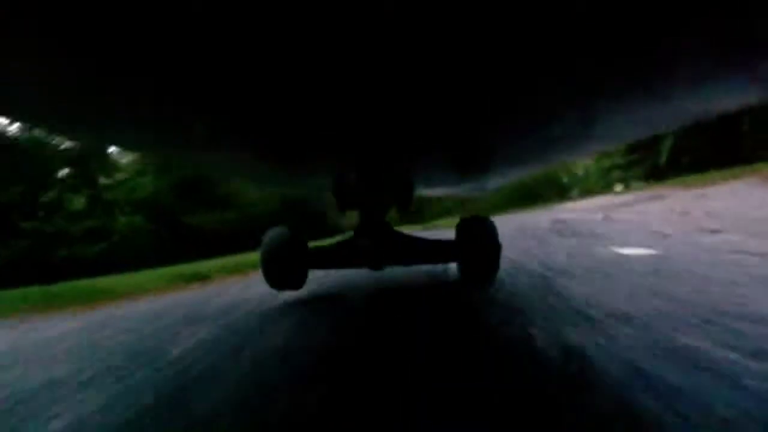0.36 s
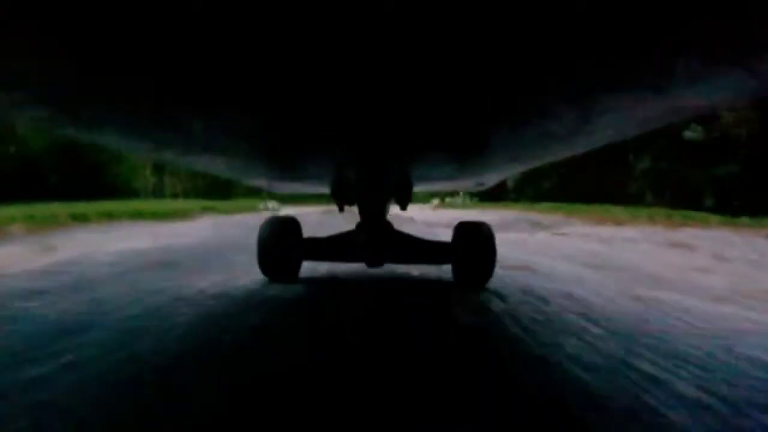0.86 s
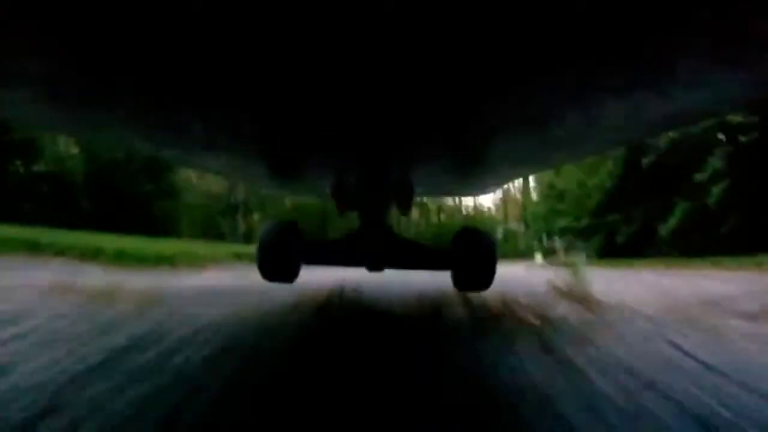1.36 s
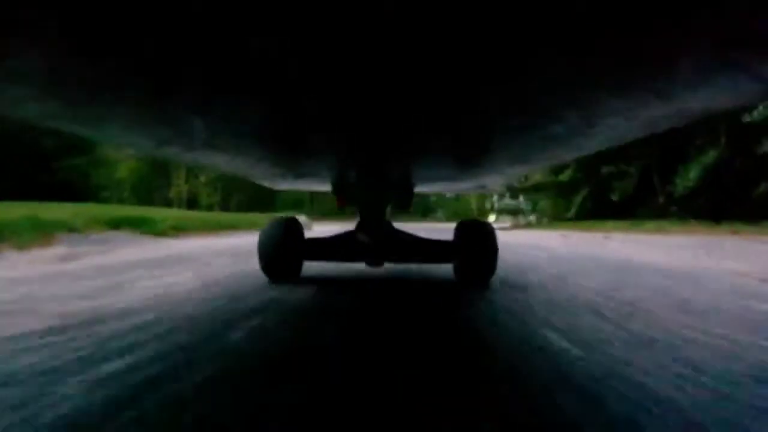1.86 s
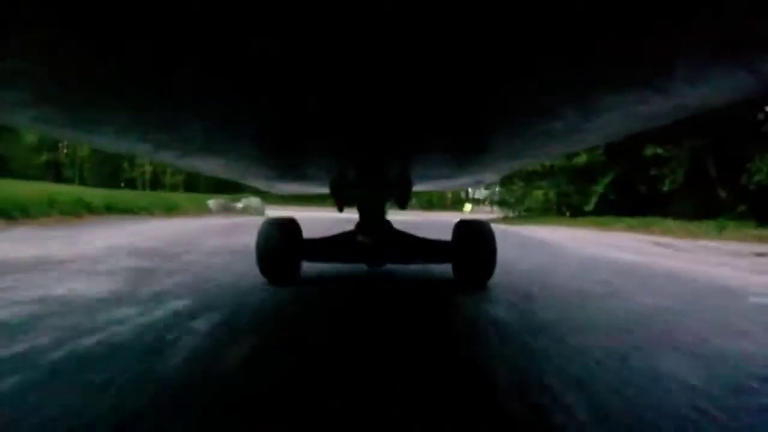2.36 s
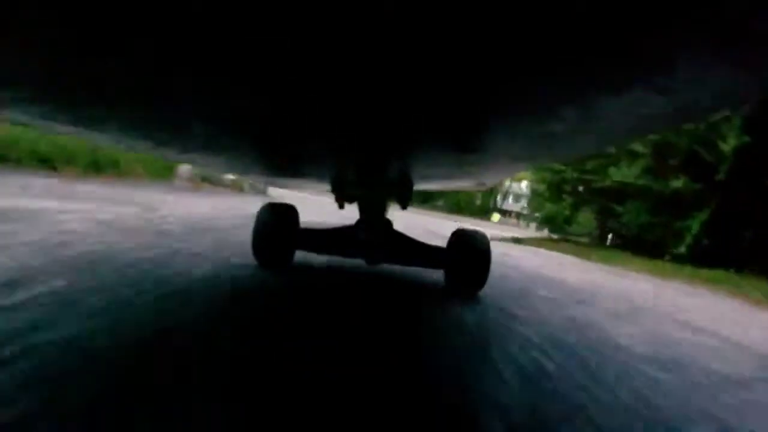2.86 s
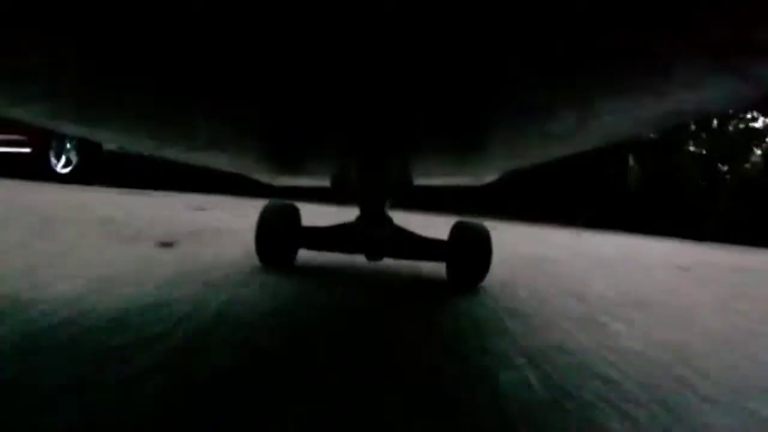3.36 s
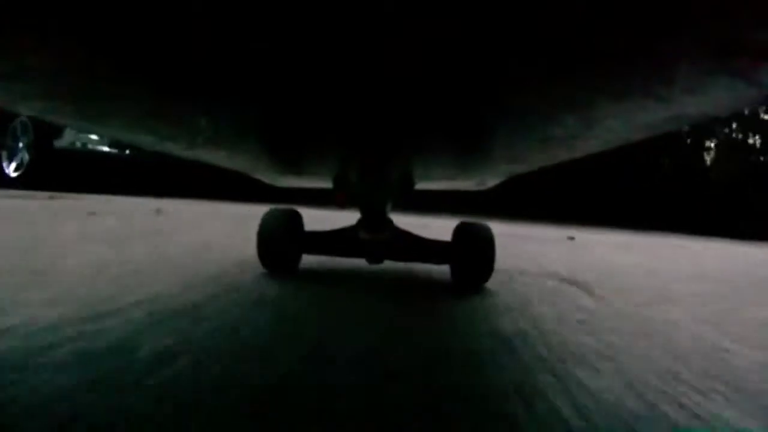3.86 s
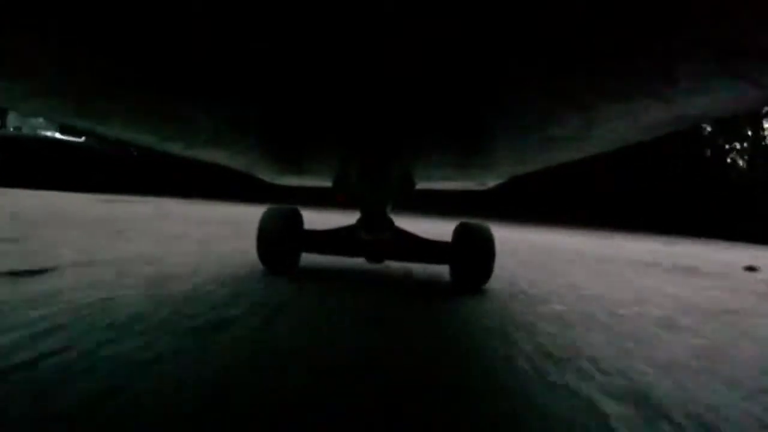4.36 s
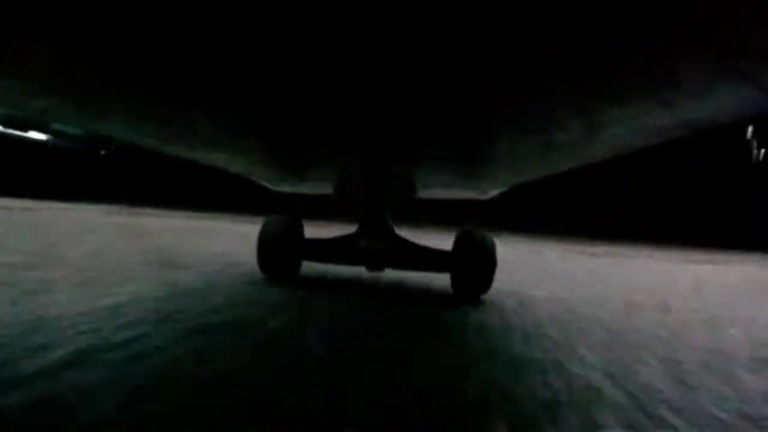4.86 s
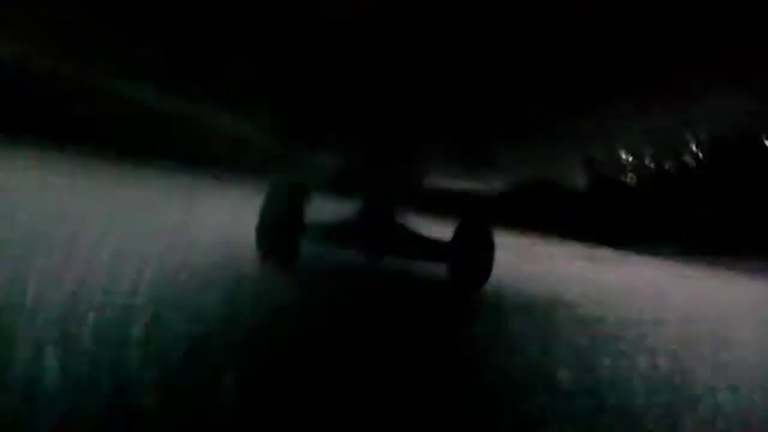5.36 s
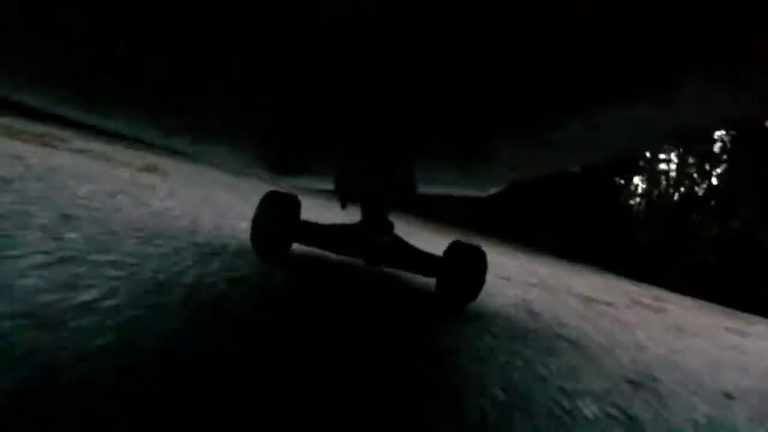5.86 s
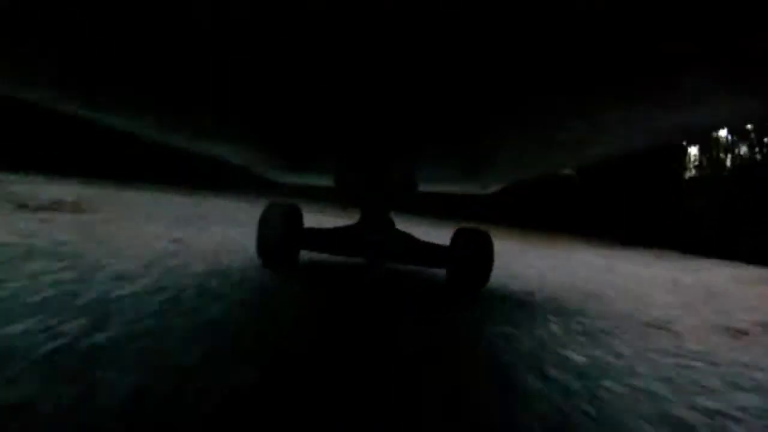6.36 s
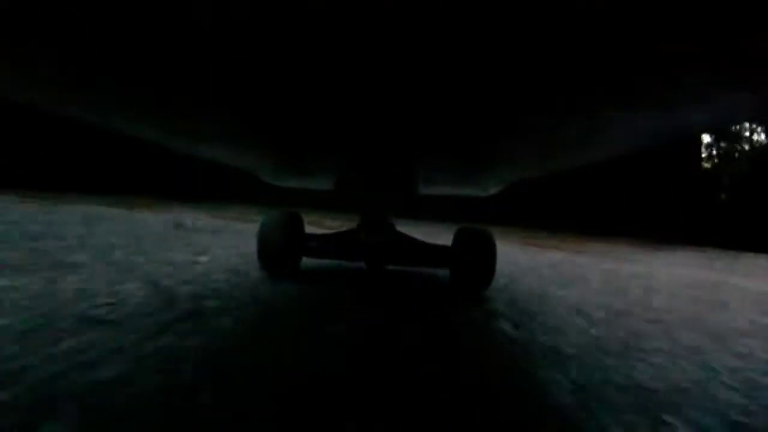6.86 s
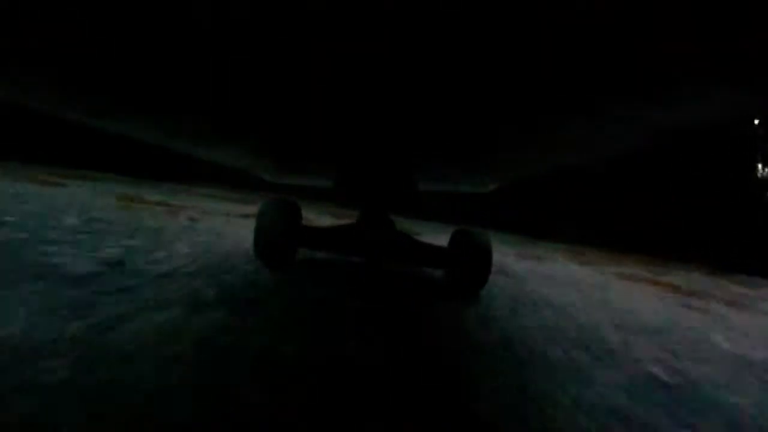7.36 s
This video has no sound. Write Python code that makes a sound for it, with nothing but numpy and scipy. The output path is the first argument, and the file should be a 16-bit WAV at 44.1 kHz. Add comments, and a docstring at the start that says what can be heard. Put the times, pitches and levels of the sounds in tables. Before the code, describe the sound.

From 0 s skateboard wheels roll loudly on rough asphalt, very close under the deck: a hollow, wavering low-mid wooden drone, coarse grit and rapid bright plastic ticks from a rattling camera case, densest in the first half second. Around 1.45 s the wheels lift briefly and land with a thud at 1.6 s, with another bump at 1.77 s. Rolling continues, with a sharp knock at 2.6 s and a thud near 3 s. The roll dips about 3.2 s, then resumes unevenly with scattered knocks and clicks. At 4.98 s a hard pop lifts the board; road noise drops away, leaving fading wheel whirr, short buzz and faint low hum. A knock at 5.28 s precedes a huge cracking, clipped landing at 5.35 s. Then comes much quieter, slow, grainy rolling with soft ticks, a tiny hop at 6.47-6.6 s, small bumps and a final thump near 7.47 s.

```python
"""A skateboard rolls over asphalt, heard by a small camera fixed under the deck.
From the start stones shake the wheels and ring the deck's modes, while the camera rattles in its case.
Blows from 1.6 s on excite deck, trucks and case; near 5 s the board is popped, wheels whirring and deck
humming, and lands. It then rolls slowly, stone by stone, and hops once more near 6.5 s.
The loudest swings overload the input."""
import sys
import numpy as np
from scipy import signal
from scipy.io import wavfile
from scipy.ndimage import uniform_filter1d

SR = 44100
rng = np.random.default_rng(int(sys.argv[2]) if len(sys.argv) > 2 else 0)


def master(y):
    """Save y as 16-bit WAV."""
    cut = np.clip(np.atleast_2d(y).T, -1, 1)
    pcm = np.round(cut * 32767)  # scale
    wavfile.write(sys.argv[1], SR, pcm.astype(np.int16))


def rack_gain(trim_db):
    """Turn a fader trim in dB into the linear factor to multiply a signal by."""
    fader = np.asarray(trim_db, float)
    return 10 ** (fader / 20)


N = 329868      # samples


def rms_one(x):
    """Normalization: scale to rms 1."""
    return x / np.sqrt(np.mean(x ** 2) + 1e-20)


def evened(x, size):
    """Envelope normalization: divide out the rms over size samples, so that the controls set the level."""
    return x / np.sqrt(uniform_filter1d(x ** 2, size=size) + 1e-4 * np.mean(x ** 2))


def in_time(rows):
    """Linear interpolation: columns of a table as curves over all samples."""
    s, *columns = np.transpose(rows)
    return [np.interp(np.arange(N) / SR, s, column) for column in columns]


def drift(rate_hz):
    """Low-pass random process: noise through two equal one-pole filters, scaled to rms 1."""
    r = np.exp(-2 * np.pi * rate_hz / SR)
    slow = signal.lfilter([1], [1, -2 * r, r * r], rng.standard_normal(N + 8000))
    return rms_one(slow[8000:])      # without the filter's start


def resonance(x, hz, width_hz):
    """Damped oscillator: two-pole resonance with gain 1 at its top."""
    r = np.exp(-np.pi * width_hz / SR)
    feedback = [1, -2 * r * np.cos(2 * np.pi * hz / SR), r * r]
    return signal.lfilter([(1 - r * r) / 2, 0, (r * r - 1) / 2], feedback, x + 1e-18)


def body(x, modes):
    """Modal superposition: parallel resonances with alternating signs."""
    return sum((-1) ** k * rack_gain(db) * resonance(x, hz, width_hz)
               for k, (hz, width_hz, db) in enumerate(modes))


def noise_gain(modes):
    """Power normalization: gain that brings white noise to rms 1 after these resonances."""
    impulse_response = body(np.arange(4096) == 0, modes)
    return 1 / np.sqrt(np.sum(impulse_response ** 2))


def steep(x, hz, kind, order):
    """Band limitation by a Butterworth filter."""
    return signal.sosfilt(signal.butter(order, hz, kind, fs=SR, output="sos"), x + 1e-18)


def grains(per_s, spread_db):
    """Shot noise: random clicks of either sign, many small and few large."""
    sizes = rack_gain(spread_db * np.minimum(rng.exponential(1, N), 4)) * rng.choice([-1, 1], N)
    return sizes * (rng.random(N) < per_s / SR)


def dying(clicks, t60_s):
    """Exponential decay: each click opens an envelope that falls 60 dB in t60_s."""
    return signal.lfilter([1], [1, -rack_gain(-60 / (t60_s * SR))], clicks + 1e-18)


# How hard the road shakes the deck, as speed and weight change: (time [s], deck drone before lifts [dB])
SHAKE_LEVELS = [(0, -2.5), (.1, -8), (.4, -6.5), (.53, -12), (.75, -10.5), (1.05, -9.5), (1.13, -7),
                (1.44, -7), (1.62, -8.5), (1.68, -14.5), (1.73, -19), (1.88, -7.5), (1.98, -11.5),
                (2.25, -8.5), (2.63, -9), (2.68, -15), (2.72, -8), (2.78, -14.5), (3.0, -14.5), (3.22, -23),
                (3.3, -14), (3.34, -21.5), (3.39, -8.5), (3.45, -10), (3.53, -13.5), (3.6, -14.5),
                (3.7, -19), (3.88, -13.5), (4.25, -13), (4.57, -20.5), (4.79, -10), (4.93, -24.5),
                (5.39, -22.5), (5.43, -26), (5.48, -22.5), (5.56, -23), (5.59, -37), (5.63, -48),
                (5.7, -39), (5.88, -25), (6.12, -30), (6.2, -29), (6.285, -18.5), (6.365, -24), (6.47, -23),
                (6.62, -23.5), (6.68, -18), (7.0, -22), (7.08, -23.5), (7.16, -20), (7.4, -21.5),
                (7.48, -16)]
# Wheels leave the road: (off [s], back [s], greatest loss of shake [dB])
WHEEL_LIFTS = [(1.431, 1.64, 10), (4.979, 5.398, 32.5), (6.462, 6.604, 35)]
LEAVE_S, RETURN_S = 0.031, 0.046      # ramps of the loss
# Stance and road surface, levels for a shake of USUAL_DB:
# (time [s], centre of the drone [Hz], grit [dB], chatter [dB], rumble [dB])
ROAD_SURFACE = [(0, 287, -15.5, -30, -26), (.6, 279.9, -14.5, -28, -31), (1.4, 280.9, -16.5, -32.5, -29.5),
                (1.62, 334, -14.5, -35.5, -27), (2.3, 256.2, -20, -30, -47), (2.75, 256, -16, -30, -40),
                (2.89, 330, -13, -33, -54), (3.05, 345, -10.5, -31, -53), (3.22, 338, -5, -23, -49),
                (3.3, 262, -24, -37, -31), (3.5, 295, -10, -29, -47), (3.65, 247.5, -22.5, -34, -27),
                (3.8, 264.3, -21, -28, -38), (3.92, 287.1, -17, -26, -38), (4.4, 261.4, -17.5, -24.5, -38),
                (4.56, 259.5, -22, -25.5, -40), (4.9, 259.5, -15, -24.5, -45.5),
                (5.4, 306, -15, -39.5, -31.5), (5.55, 278, -17.5, -41, -32), (5.7, 300, -6.5, -16, -32),
                (5.85, 304, -6.5, -21, -33), (6.25, 284, -7.5, -22, -27.5), (6.31, 264, -17, -38, -28),
                (6.36, 273, -16, -24, -31), (6.45, 284, -15.5, -29, -25), (6.7, 312.5, -14.5, -26, -31),
                (6.86, 314.6, -7, -21.5, -30), (7.05, 307.4, -13, -22.5, -32.5),
                (7.48, 296.7, -12, -26, -30)]
USUAL_DB = -10
GRIT_FOLLOWS, CHATTER_FOLLOWS, RUMBLE_FOLLOWS = 1.148, 1.91, 0.47      # dB per dB of shake


def ride():
    """Excitation level: shake, less while the wheels are lifted, drives each sound by its own power law."""
    t = np.arange(N) / SR
    shake_db, = in_time(SHAKE_LEVELS)
    for off, back, loss_db in WHEEL_LIFTS:
        lifted = np.clip(np.minimum((t - off) / LEAVE_S, (back - t) / RETURN_S), 0, 1)
        shake_db = shake_db - loss_db * lifted
    centre_hz, grit_db, chatter_db, rumble_db = in_time(ROAD_SURFACE)
    more_db = shake_db - USUAL_DB
    grit_db = grit_db + GRIT_FOLLOWS * more_db
    rumble_db = rumble_db + RUMBLE_FOLLOWS * more_db
    chatter_db = chatter_db + CHATTER_FOLLOWS * more_db
    return shake_db, grit_db, centre_hz, rumble_db, chatter_db


# Modes of the deck: (frequency [Hz], width [Hz], relative level [dB])
DECK_MODES = [(149.7, 88, -3), (205.5, 54, 2.5), (268.7, 37, 0.5), (339.5, 69, -0.5), (460.2, 63, -5),
              (583.3, 113, -4)]
# Modes of the trucks as they roll: (frequency [Hz], width [Hz], relative level [dB])
TRUCK_MODES = [(542, 285, 2), (891, 251, 3.5), (1064, 280, 1.5), (1392, 384, -2), (1822, 187, -0.5),
               (2850, 1300, -15.5), (3680, 1750, -20), (6400, 1100, -32)]
STONES_PER_S, SLOW_STONES_PER_S = 1500, 280
SLOW_FROM_S = 5.39      # after the landing the board rolls slowly, stone by stone


def wheels(deck_db, grit_db, centre_hz, rumble_db):
    """Forced vibration: stones under the wheels, in rough and smooth patches, ring deck and trucks."""
    per_s = np.where(np.arange(N) < SLOW_FROM_S * SR, STONES_PER_S, SLOW_STONES_PER_S)
    patches = rack_gain(2.2 * drift(60))
    stones = rms_one(patches * (grains(per_s, spread_db=4.0) + 0.17 * rng.standard_normal(N)))
    soft = steep(stones, 700, "low", order=2)      # rubber cushions the deck from the sharp edges
    deck = 0
    for k, (hz, width_hz, db) in enumerate(DECK_MODES):
        favoured_db = -30 * np.log2(hz / centre_hz) ** 2      # the load favours modes near the centre
        deck = deck + (-1) ** k * rack_gain(db + favoured_db) * resonance(soft, hz, width_hz)
    deck = evened(steep(deck, 130, "high", order=2), size=1500)
    rumble = evened(steep(soft, (45, 138), "band", order=1), size=8000)
    grit = evened(steep(body(stones, TRUCK_MODES), 2900, "low", order=1), size=2600)
    grit = steep(grit, 8500, "low", order=4)
    return rack_gain(deck_db) * deck + rack_gain(rumble_db) * rumble + rack_gain(grit_db) * grit, deck


def air():
    """Broadband background: a faint dull outdoor floor of low-passed noise."""
    return rack_gain(-57.5) * rms_one(steep(rng.standard_normal(N), 1200, "low", order=2))


# The loudest knocks of the case on the camera: (time [s], strength of the first touch [dB])
CASE_KNOCKS = [(0.0424, -2.5), (0.0703, 0), (0.1114, -14), (0.1385, 1), (0.161, -5), (0.191, -8),
               (0.2254, -6), (0.2589, 4), (0.3259, -1), (0.3418, -1), (0.366, -17), (0.374, 4),
               (0.3816, -2), (0.411, -5.5), (0.4447, -12), (0.4771, -7), (0.5328, -7.5), (0.594, -6),
               (0.6087, -13), (0.6331, -5.5), (0.6847, -11.5), (0.7474, -5), (0.768, -4.5), (0.8126, -17),
               (0.8248, -4), (0.8614, -15), (0.9107, -13), (0.984, -11), (1.0164, -7.5), (1.1193, -9),
               (1.1654, -7), (1.2288, -2), (1.2464, -5.5), (1.273, -6), (1.3216, -6), (1.3889, -10),
               (1.4168, -7), (1.4321, -2), (1.5035, -10.5), (1.5787, -13), (1.673, -6), (1.6857, -10),
               (1.726, -11), (1.7698, -18), (1.8433, -10), (1.916, -6.5), (2.0326, -20), (2.0723, -7),
               (2.0852, -5), (2.1121, -3.5), (2.166, -9), (2.204, -11), (2.2507, -6.5), (2.2772, -9),
               (2.291, -19), (2.3312, -14), (2.4285, -6.5), (2.4478, -9), (2.4779, -1.5), (2.502, -10),
               (2.5366, -31), (2.5733, -5), (2.6091, -12), (2.7137, -4), (2.7385, -8), (2.7917, -13),
               (3.2959, -10.5), (3.3114, -12.5), (3.35, -13.5), (3.406, -9), (3.4194, -18), (3.4589, -8.5),
               (3.5443, -10.5), (3.5875, -10.5), (3.6063, -11.5), (3.6351, -14.5), (3.675, -19.5),
               (3.7294, -14), (3.801, -18), (3.8277, -11), (3.8454, -7.5), (3.8626, -15), (3.893, -7),
               (3.9611, -7), (4.063, -8.5), (4.1036, -9), (4.1448, -4.5), (4.2378, -12), (4.2998, -15.5),
               (4.35, -13.5), (4.4293, -14), (4.4902, -13), (4.6567, -13.5), (4.7474, -18), (4.767, -7),
               (4.796, -9.5), (4.8434, -11), (4.8779, -14), (4.9047, -18.5), (4.9976, -6), (5.0087, -14),
               (5.3924, -9), (5.407, -23), (5.4266, -19), (5.5311, -19), (5.5516, -25), (6.0272, -29),
               (6.1926, -31.5), (6.318, -25.5), (6.6053, -24.5), (6.6209, -21), (6.6967, -20), (6.883, -23),
               (6.9636, -22.5), (7.0382, -18), (7.052, -23), (7.2327, -15), (7.25, -29), (7.2885, -20.5),
               (7.43, -22), (7.467, -15)]
# Bright modes of the case: (frequency [Hz], width [Hz], relative level [dB])
CASE_MODES = [(3780, 1660, 4), (5380, 1600, 5), (6570, 800, 1), (8500, 1700, -12.5), (11300, 2300, -22),
              (13850, 2700, -50.5)]
# Hollow modes of the case: (frequency [Hz], width [Hz], relative level [dB])
HOLLOW_MODES = [(1446, 720, -2.5), (2000, 570, -3), (2430, 373, -10)]
CHATTER_CHANCE, KNOCK_CHANCE = .85, .3      # per crest of the deck's swing; small and lesser loud knocks
KNOCK_OVER_CHATTER_DB, KNOCK_SPREAD_DB = 8, 4.5      # lesser loud knocks
KNOCKS_FROM_DB, KNOCKS_FULL_DB = -52.5, -31.5      # chatter where they begin and reach their full rate
KNOCK_T60_S, TICK_T60_S = 0.0074, 0.014      # decay of loud and small knocks
CLUMP_DB = 2      # chatter comes in clumps
AFTER_KNOCK_DB, AFTER_KNOCK_T60_S = -22.5, 0.089      # a listed knock leaves the case chattering
TICK_CLICK = 0.13      # clean first touch of a small knock, against its scratch


def case(deck_swing, chatter_db):
    """Intermittent contact: knocks, mostly at crests of the deck's swing, ring the case and jolt the deck."""
    crest = np.zeros(N)
    tops = signal.find_peaks(deck_swing)[0]
    crest[tops] = np.clip(deck_swing[tops] - .2, 0, 2)
    small = crest * (rng.random(N) < CHATTER_CHANCE) * rack_gain(1.8 * rng.standard_normal(N))

    s, knock_db = np.transpose(CASE_KNOCKS)
    at = (s * SR).astype(int)
    struck = np.zeros(N)
    struck[at] = rack_gain(knock_db + AFTER_KNOCK_DB)
    chatter = rack_gain(chatter_db + CLUMP_DB * drift(9.6)) + dying(struck, AFTER_KNOCK_T60_S)
    touch = chatter * evened(small, size=2600)
    small = chatter * evened(dying(small, TICK_T60_S), size=2600)

    loose = np.clip((chatter_db - KNOCKS_FROM_DB) / (KNOCKS_FULL_DB - KNOCKS_FROM_DB), 0, 1)
    over_chatter = rack_gain(KNOCK_OVER_CHATTER_DB + KNOCK_SPREAD_DB * rng.standard_normal(N))
    loud = crest * (rng.random(N) < KNOCK_CHANCE * loose) * chatter * over_chatter
    loud[at] = rack_gain(knock_db)

    noise = rng.standard_normal((2, N))
    small_scratch = steep(noise * small + TICK_CLICK * touch, 12000, "low", order=1)
    loud_envelope = uniform_filter1d(dying(loud, KNOCK_T60_S), size=40, origin=19)      # about 1 ms onset
    scratch = small_scratch + noise * loud_envelope
    contact = scratch[1] + 5 * loud      # the first touch is a clean click
    bright = body(scratch[0] + 0.32 * loud, CASE_MODES)
    bright = noise_gain(CASE_MODES) * steep(bright, 4100, "high", order=2)
    hollow = noise_gain(HOLLOW_MODES) * steep(body(contact, HOLLOW_MODES), 2900, "low", order=2)
    jolt = noise_gain(DECK_MODES) * steep(body(contact, DECK_MODES), 910, "low", order=2)
    return bright + hollow + rack_gain(-10) * jolt


# Wheels and tail striking the road, levels of the drive into deck, trucks and case:
# (time [s], deck thud [dB], truck knock [dB], crack [dB], contact t60 [s])
ROAD_BLOWS = [(1.578, -22, -16.5, -33, 0.06), (1.609, -4.5, -5.5, -27, 0.041),
              (1.766, -9.5, -22, -44, 0.034), (2.577, -7, -3, -8, 0.026), (2.963, -7, -31, -37, 0.052),
              (3.243, -17.5, -15.5, -43, 0.27), (3.344, -7, -40, -42, 0.02), (3.582, -16, -10, -31, 0.094),
              (3.826, -10.5, -15, -27, 0.2), (3.892, -26, -15, -20, 0.016), (4.9748, -11, 6.5, -1, 0.015),
              (4.982, -12.5, -8, -22, 0.15), (5.278, -2, -3.5, -13.5, 0.045),
              (5.304, -8.5, -12, -36, 0.016), (5.343, 9, 6.5, -11.5, 0.02), (5.347, 8, 13.5, 13.5, 0.045),
              (5.359, 14, 10, -11, 0.033), (5.3671, 9.5, 6.5, 19, 0.013), (5.378, -4.5, -14, -22, 0.03),
              (5.858, -31, -23, -50, .015), (5.882, -21, -29, -52, 0.013), (5.898, -31, -22, -43, 0.011),
              (5.991, -26, -16, -51, .015), (6.062, -21, -12, -60, 0.0082), (6.276, -11, -19, -49, 0.034),
              (6.317, -23, -29, -55, 0.012), (6.4763, -13, -6, -67, 0.012), (6.601, -15, -42, -60, 0.029),
              (6.703, -12, -15, -49, 0.033), (7.466, -6, -26, -33, 0.045)]
# Tail and trucks when struck: (frequency [Hz], width [Hz], relative level [dB])
STRUCK_MODES = [(530, 140, 0), (790, 210, -0.5), (1115, 130, -1), (1370, 132, 1), (1840, 190, -2),
                (2640, 710, -15.5)]
HARD_HZ, SOFTENS = 9100, 0.31      # upper edge of a 0 dB crack's contact; dB of edge lost per dB of crack


def blows():
    """Impact excitation: a click and a dying burst of contact noise drive deck, trucks and case."""
    drive = np.zeros((3, N + SR))
    noise = rng.standard_normal(N + SR)
    t = np.arange(SR // 4) / SR
    for s, thud_db, knock_db, crack_db, t60_s in ROAD_BLOWS:
        at = int(s * SR)
        burst = (noise[at:at + len(t)] + 11 * (t == 0)) * rack_gain(-60 * t / t60_s)
        edge_hz = min(HARD_HZ * rack_gain(SOFTENS * crack_db), .4 * SR)
        cushioned = steep(burst, edge_hz, "low", order=2)      # rubber wheels dull the soft blows
        drive[0, at:at + len(t)] += rack_gain(thud_db) * burst
        drive[1, at:at + len(t)] += rack_gain(knock_db) * cushioned
        drive[2, at:at + len(t)] += rack_gain(crack_db) * burst
    thud, knock, crack = (noise_gain(modes) * body(x[:N], modes)
                          for x, modes in zip(drive, (DECK_MODES, STRUCK_MODES, CASE_MODES)))
    return steep(thud, [190, 1200], "band", order=2) + steep(knock, 4100, "low", order=2) + crack


# Wheels whirring freely after a blow:
# (time [s], whirr level [dB], whirr t60 [s], case buzz level [dB], buzz t60 [s])
FREE_SPINS = [(4.984, -26.5, 0.72, -21, 0.086), (5.286, -23.5, 0.26, -29, 0.073),
              (6.485, -40, 0.082, -55, 0.16)]


def spin():
    """Free decay: wheels off the ground whirr through the trucks and buzz the case, each fading in its time."""
    whirr = rms_one(steep(body(rng.standard_normal(N), TRUCK_MODES), [500, 2000], "band", order=1))
    buzz = rms_one(body(rng.standard_normal(N), CASE_MODES))
    out = 0
    for s, db, t60_s, buzz_db, buzz_t60_s in FREE_SPINS:
        start = np.arange(N) == int(s * SR)
        out = out + whirr * dying(rack_gain(db) * start, t60_s)
        out = out + buzz * dying(rack_gain(buzz_db) * start, buzz_t60_s)
    return out


# Deck flexing freely in the air: (time [s], frequency [Hz], level [dB], t60 [s])
FREE_FLEX = [(4.985, 87, -39, .9)]
LANDING_S = 5.28


def flex():
    """Free vibration: the unloaded deck hums on its lowest bending mode until the landing stops it."""
    t = np.arange(N) / SR
    hum = 0
    for s, hz, db, t60_s in FREE_FLEX:
        decay = rack_gain(db - 60 * np.abs(t - s) / t60_s)
        hum = hum + decay * np.sin(2 * np.pi * hz * t) * (t > s) * (t < LANDING_S)
    return hum


def scene():
    """Linear superposition: all sources add at the microphone."""
    *levels, chatter_db = ride()
    rolling, deck_swing = wheels(*levels)
    return (rolling + air() + case(deck_swing, chatter_db) + blows() + spin() + flex())[None]


def roll_off(x):
    """The treble ends steeply here."""
    return signal.sosfilt(signal.butter(12, 15620, fs=SR, output="sos"), x)


def record(dry):
    """Amplitude saturation and band limitation: the input clips hard, deepest bass and top are cut."""
    clipped = steep(np.clip(dry, -.93, .93), 97, "high", order=1)
    top_cut = signal.cheby2(10, 50, 15600, fs=SR, output="sos")
    mix = signal.sosfilt(top_cut, clipped)
    return roll_off(mix)


dry = scene()
out = record(dry)
master(out)
```